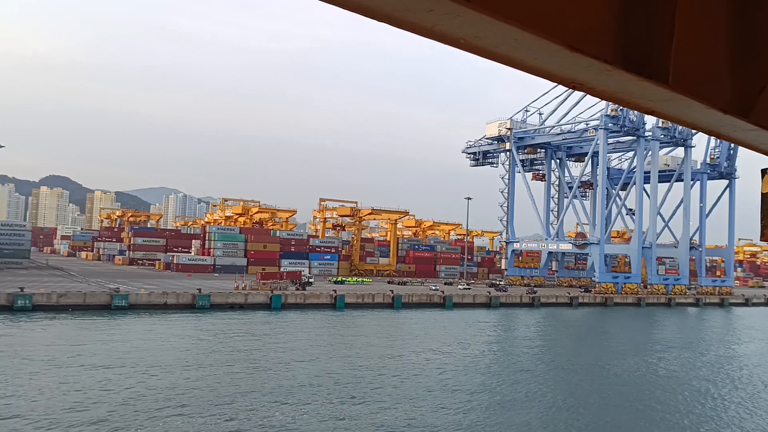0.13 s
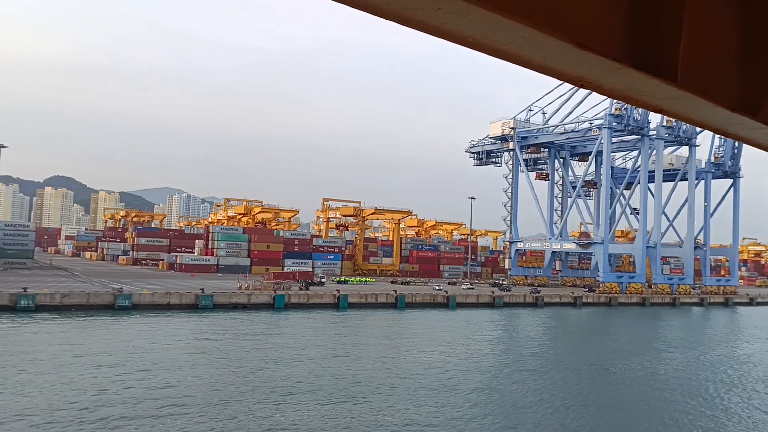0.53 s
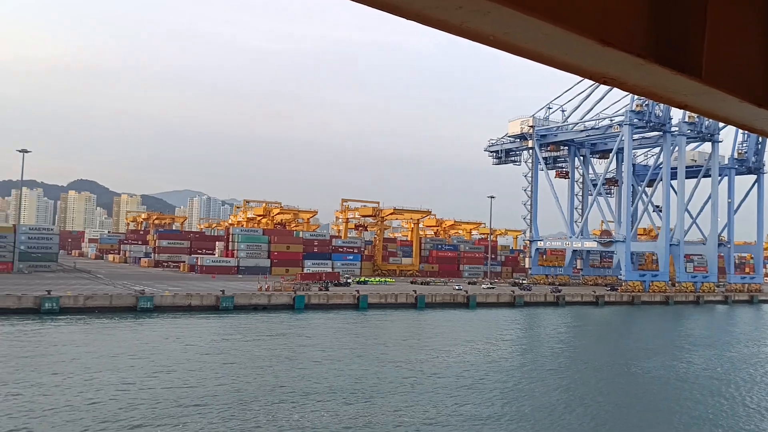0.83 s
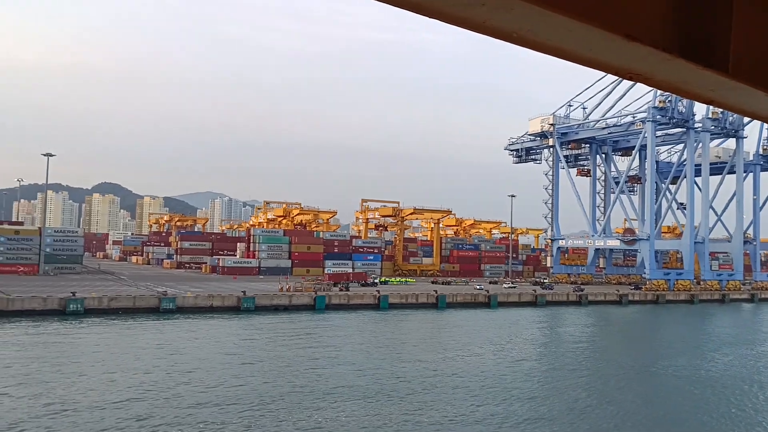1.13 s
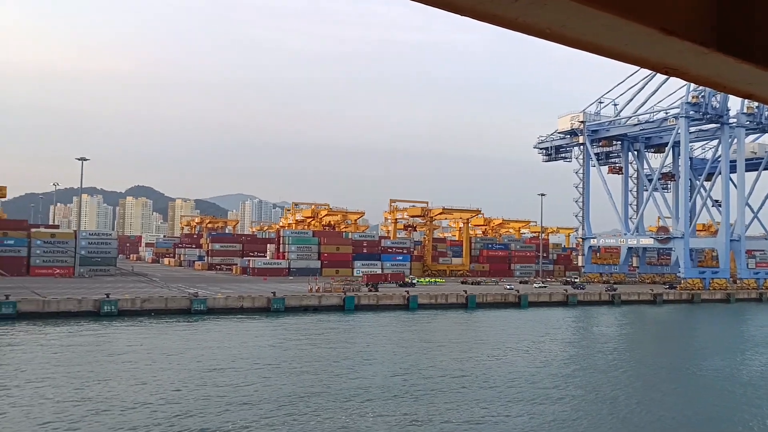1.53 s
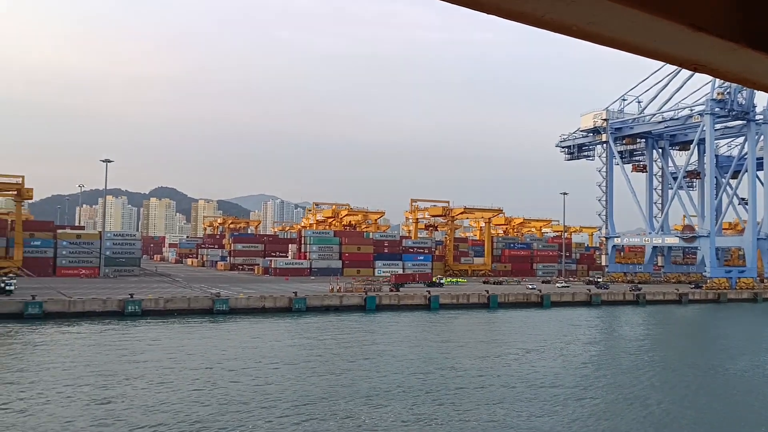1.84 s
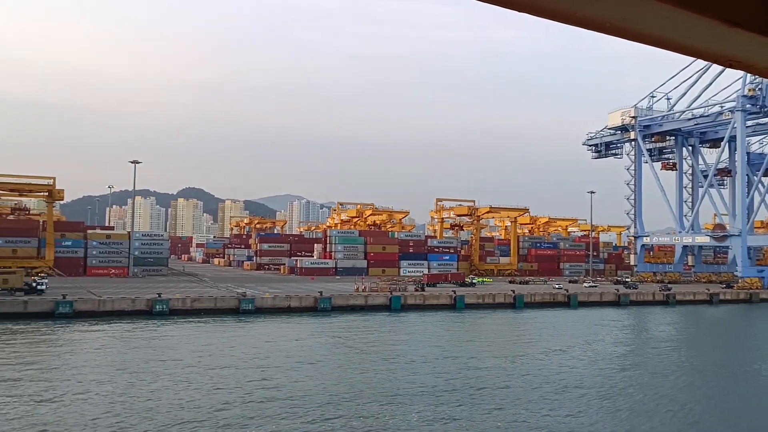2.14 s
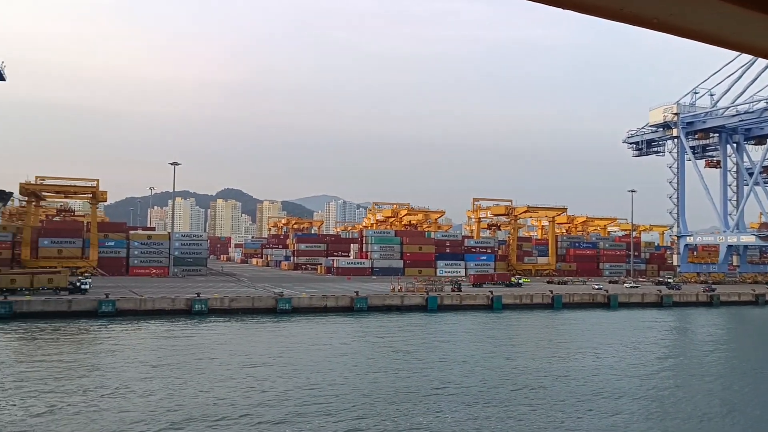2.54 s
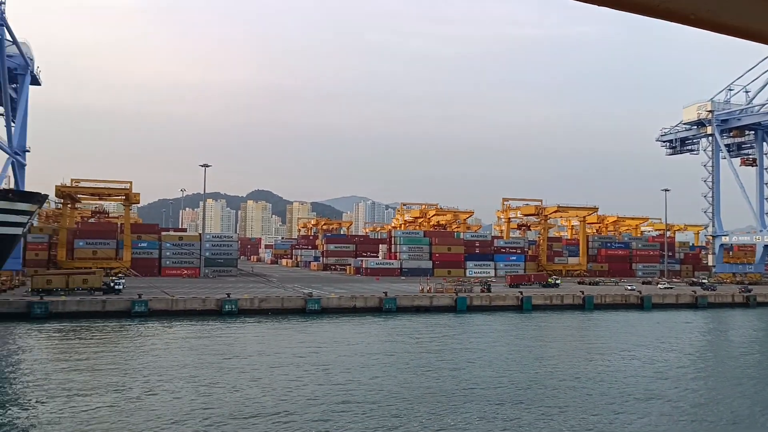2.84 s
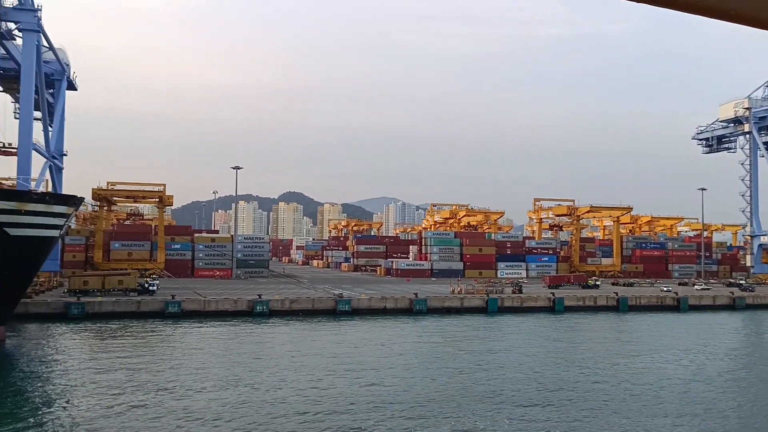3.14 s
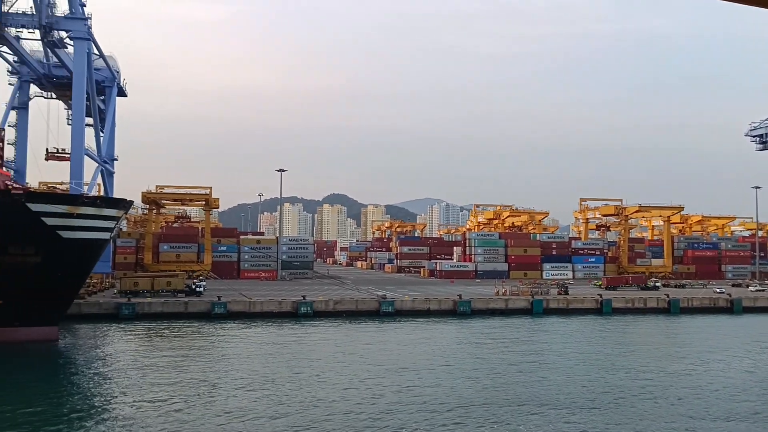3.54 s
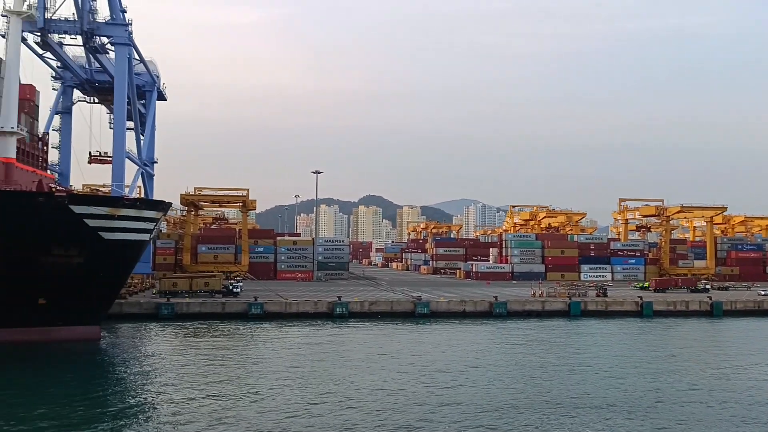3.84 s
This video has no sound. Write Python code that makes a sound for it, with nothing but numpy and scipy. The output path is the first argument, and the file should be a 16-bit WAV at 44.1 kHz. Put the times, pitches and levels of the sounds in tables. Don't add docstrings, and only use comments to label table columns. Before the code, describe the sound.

Close stereo pickup on a ship's deck in harbour: low, droning diesel exhaust pulses run throughout, under broad fan roar and soft air hiss, with a pure high whine fluttering and faint, brief air spits.

```python
import sys
import numpy as np
from scipy import signal
from scipy.fft import rfft, irfft
from scipy.io import wavfile

SR = 44100
rng = np.random.default_rng(int(sys.argv[2]) if len(sys.argv) > 2 else 0)


def wav_out(sig):
    wavfile.write(sys.argv[1], SR, np.round(np.clip(np.atleast_2d(sig).T, -1, 1) * 32767).astype(np.int16))


def linear_from_db(decibels):
    return 10 ** (np.asarray(decibels, float) / 20)


N = 176400
T = np.arange(N) / SR
CYCLE_HZ = 5.9843

# (frequency [Hz], density [dB per Hz])
RUMBLE_COLOUR = [(7, -27), (13, -15), (18, -28), (50, -22.5), (80, -7), (130, 3), (250, -3), (700, -24.5)]
# (frequency [Hz], density [dB per Hz])
ROAR_COLOUR = [(250, -24.5), (450, -0.5), (800, -4), (1250, -7.5), (1700, -10.5), (2400, -9), (3300, -16.5),
               (5000, -36.5)]
# (frequency [Hz], density [dB per Hz])
HISS_COLOUR = [(2600, -17), (3700, -1.5), (4800, -10.5), (6300, -15.5), (7600, -19), (9300, -27.5),
               (11000, -35), (16000, -37.5)]
# (frequency [Hz], likeness [-1 to 1])
EAR_LIKENESS = [(60, 0.94), (210, 1), (330, 0.66), (500, 0.68), (770, 0.65), (1170, 0.11), (1790, -0.11),
                (2740, -0.057)]
# (frequency [Hz], left minus right [dB])
EAR_LEANING = [(700, -.2), (1200, -0.5), (1800, -8.5), (2740, -7.5), (3700, -1.5), (4800, 3), (9000, 3.5),
               (12500, 1.5)]
WHISTLE_PITCHES = [5440, 8060, 1374, 826.5, 2470, 672]
# (width [Hz], level [dB], left minus right [dB])
WHISTLE_SHAPES = [(340, -55.5, 4), (230, -75.5, 14.5), (20, -49, -6), (15.9, -49.5, 5.5), (40, -56, -11),
                  (60, -51, -1.5)]
TONE_PITCHES = [921.6, 1656, 2787, 3788, 9680, 9958, 10000, 10041, 10319, 10680]
# (level [dB], left minus right [dB], fading [dB])
TONE_SHAPES = [(-44.5, 0, 3.5), (-58, -4, 3), (-66, 3, 3), (-68, 0, 3), (-85, 7, 4), (-91, 7, 4),
               (-82, 7, 4), (-88, 7, 4), (-83.5, 7, 4), (-95, 7, 4)]
# (time [s], level [dB], time to fall 60 dB [s])
VALVE_SPITS = [
    (.143, -49, .02),
    (1.014, -58.5, .3),
    (2.519, -60.5, .27),
    (3.908, -66, .05),
]
# (time [s], left [dB], right [dB], longer path to the right ear [cm])
BLOWER_WHINE = [(.3, -46, -48.5, 1), (.57, -32, -31, 0.98), (.77, -37, -37, 8.3), (.9, -30.5, -28.5, 6.7),
                (1.1, -38, -34.5, 8.7), (1.26, -54, -47, 4.1), (1.45, -36, -36, 2),
                (1.62, -30.5, -33.5, 4.3), (1.72, -31.5, -22, 5), (2.05, -31.5, -35.5, 3.5),
                (2.24, -39, -38, 9.8), (2.5, -34.5, -42, 2), (2.64, -35, -36.5, 6.4),
                (2.76, -43, -31.5, 3.4), (3.07, -38.5, -34, 5.8), (3.28, -46, -48.5, 3.8),
                (3.56, -46, -32, 3.2), (3.82, -33, -29, 7.1)]
# (firing time [s], level [dB], ring of its exhaust pipe [Hz])
CYLINDERS = [
    (-.0014, -14.5, 146),
    (.0265, -19, 176),
    (.0555, -17, 148),
    (.0833, -19.5, 175),
    (.112, -8, 146),
    (.1385, -14.5, 136),
]
# (frequency [Hz], level [dB], time to fall 60 dB [s])
FUNNEL_RINGS = [(107, -11.5, .4), (190, -16, .4)]
ORDERS_11_TO_40 = [-58, -53.5, -52.5, -44.5, -46.5, -62, -50, -34.5, -53, -40.5, -56, -63.5, -33.5, -31,
                   -33.0, -33, -41.5, -55, -36.5, -46, -60.5, -40.5, -41.5, -60.5, -40, -35.5, -46, -57,
                   -50, -47]
ORDERS_41_TO_70 = [-38.5, -51, -45.5, -50.5, -47, -55, -55, -46, -51.5, -48.5, -49, -45.5, -60.5, -52.5,
                   -45.5, -43.5, -55.5, -44.5, -65, -67, -50, -51.0, -55.5, -48, -48.5, -53, -49.5, -61.5,
                   -50, -45]
# (time [s], gain [dB])
FADE_IN = [
    (.1, -88),
    (.108, -41),
    (0.126, -26.5),
    (.22, -17),
    (.3, -11),
    (.38, -4.5),
    (.46, -3),
    (.56, 0.5),
]


def rms_one(x):
    return x / np.sqrt(np.mean(x ** 2) + 1e-20)


def at_hz(points, hz):
    table_hz, value = np.array(points).T
    return np.interp(np.log(hz + 1), np.log(table_hz), value)


def drift(rate_hz, count=1):
    r = np.exp(-2 * np.pi * rate_hz * 40 / SR)
    noise = rng.standard_normal((count, N // 40 + 2002))
    slow = signal.lfilter([1], [1, -2 * r, r * r], noise)[:, 2000:]
    place = np.arange(N) / 40
    return np.array([np.interp(place, np.arange(len(row)), rms_one(row - row.mean())) for row in slow])


def pan(left_minus_right_db):
    return linear_from_db(np.array([[left_minus_right_db / 2], [-left_minus_right_db / 2]]))


def air_noise(colour):
    hz = np.arange(N // 2 + 1) * SR / N
    mid, side = rfft(rng.standard_normal((2, N)))
    alike = np.clip(at_hz(EAR_LIKENESS, hz), -1, 1)
    sign = np.array([[1], [-1]])
    ears = np.sqrt(1 + alike) * mid + sign * np.sqrt(1 - alike) * side
    inside = (hz > colour[0][0]) & (hz < colour[-1][0])
    level_db = at_hz(colour, hz) + sign * at_hz(EAR_LEANING, hz) / 2
    return rms_one(irfft(ears * inside * linear_from_db(level_db), N))


def fans():
    gust_db = 0.25 * drift(0.8, count=3) + 0.5 * drift(8.8, count=3)
    rumble = linear_from_db(-33 + gust_db[0]) * air_noise(RUMBLE_COLOUR)
    roar = linear_from_db(-32.5 + gust_db[1]) * air_noise(ROAR_COLOUR)
    hiss = linear_from_db(-50 + gust_db[2]) * air_noise(HISS_COLOUR)
    return rumble + roar + hiss


def duct_whistles():
    swell_db = 1.2
    out = 0
    for hz, (width_hz, level_db, pan_db) in zip(WHISTLE_PITCHES, WHISTLE_SHAPES):
        r = np.exp(-np.pi * width_hz / SR)
        resonance = [0.97, 0.0029, -0.957, 1, -2 * r * np.cos(2 * np.pi * hz / SR), r * r]
        whistle = rms_one(signal.sosfilt([resonance] * 2, rng.standard_normal((2, N))))
        out = out + linear_from_db(level_db + swell_db * drift(4.7)) * pan(pan_db) * whistle
    return out


def fan_and_drive_tones():
    out = 0
    for hz, (level_db, pan_db, fading_db) in zip(TONE_PITCHES, TONE_SHAPES):
        gain = np.sqrt(2) * linear_from_db(level_db + fading_db * drift(5.4, count=2)) * pan(pan_db)
        out = out + gain * np.cos(2 * np.pi * hz * T + 1.07 * drift(3.0, count=2))
    return out


def air_valve():
    band = signal.butter(2, [7000, 15000], "band", fs=SR, output="sos")
    air = signal.sosfilt(band, rng.standard_normal((2, N)))
    shape = 0
    for start_s, level_db, t60_s in VALVE_SPITS:
        since_s = np.maximum(T - start_s, 0)
        shape = shape + (T > start_s) * linear_from_db(level_db - 60 * since_s / t60_s)
    return pan(5.5) * shape * air


def blower_whine():
    whine_hz, wander_hz, sound_cm_per_s = 1894, 0.38, 34300
    time_s, *columns = np.transpose(BLOWER_WHINE)
    left_db, right_db, path_cm = [np.interp(T, time_s, column) for column in columns]
    phase = 2 * np.pi * np.cumsum(whine_hz + wander_hz * drift(3.7)[0]) / SR
    left_lead = 2 * np.pi * whine_hz * path_cm / sound_cm_per_s
    level_db = np.array([left_db, right_db]) + 3.0 * drift(7.6, count=2)
    return np.sqrt(2) * linear_from_db(level_db) * np.cos([phase + left_lead, phase])


def ring(hz, ring_hz, t60_s):
    decay_hz = np.log(1000) / (2 * np.pi * t60_s)
    return ring_hz / ((decay_hz + 1j * hz) ** 2 + ring_hz ** 2)


def exhaust_phases(order, hz):
    funnel = sum(linear_from_db(db) * ring(hz, ring_hz, t60_s) for ring_hz, db, t60_s in FUNNEL_RINGS)
    cycle = 0
    for firing_s, level_db, pipe_hz in CYLINDERS:
        puff = linear_from_db(level_db) * np.exp(-2j * np.pi * hz * firing_s)
        cycle = cycle + puff * (ring(hz, pipe_hz, 0.3) + funnel)
    outlet = (1j * hz / (1j * hz + 100)) ** 2
    hull_lag_s = 0.03 * (hz < 105)
    scatter = np.pi * np.clip((order - 34) / 3, 0, 1) * rng.uniform(-0.97, 1, len(order))
    return np.angle(cycle * outlet) - 2 * np.pi * hz * hull_lag_s + scatter


def diesel_engine():
    firing_order_db, waver_db, side_db = -48, 0.68, -23
    order = np.r_[6, 11:71]
    hz = order * CYCLE_HZ
    level_db = np.r_[firing_order_db, ORDERS_11_TO_40, ORDERS_41_TO_70]
    start = exhaust_phases(order, hz)
    waver = drift(0.94, count=8)
    skew = rng.normal(0, 1, len(order)) * linear_from_db(side_db) * hz / 100

    crank = np.linspace(0, 1, 4097)
    turn = 2 * np.pi * np.outer(order, crank) + start[:, None]
    gain = np.sqrt(2) * linear_from_db(level_db)[:, None]
    mid = gain * np.cos(turn)
    side = gain * skew[:, None] * np.sin(turn)

    out = np.zeros((2, N))
    now = T * CYCLE_HZ % 1
    for k in range(8):
        left = (mid + side)[k::8].sum(axis=0)
        right = (mid - side)[k::8].sum(axis=0)
        ears = np.array([np.interp(now, crank, left), np.interp(now, crank, right)])
        out += linear_from_db(waver_db * waver[k]) * ears
    return out


def scene():
    background = fans() + duct_whistles() + fan_and_drive_tones()
    return background + air_valve() + blower_whine() + diesel_engine()


def band_limit(x):
    return signal.sosfilt(signal.butter(12, 15940, fs=SR, output="sos"), x)


def record(dry):
    time_s, gain_db = np.transpose(FADE_IN)
    faded = dry * linear_from_db(np.interp(T, time_s, gain_db))
    self_noise = linear_from_db(-86) * rng.standard_normal(dry.shape)
    mix = (faded + self_noise) * (T > time_s[0])
    return band_limit(mix)


dry = scene()
out = record(dry)
wav_out(out)
```